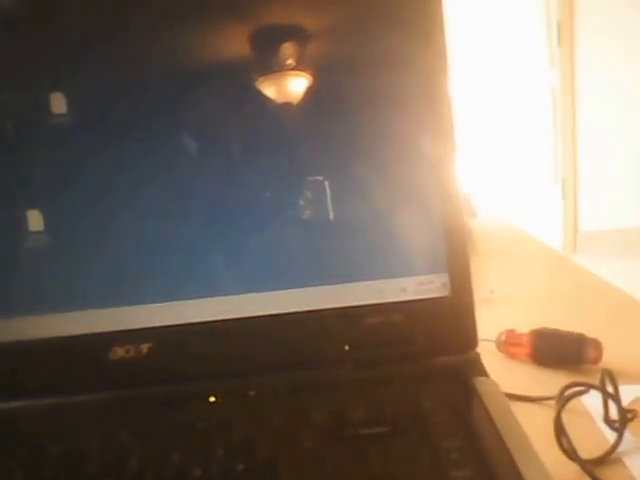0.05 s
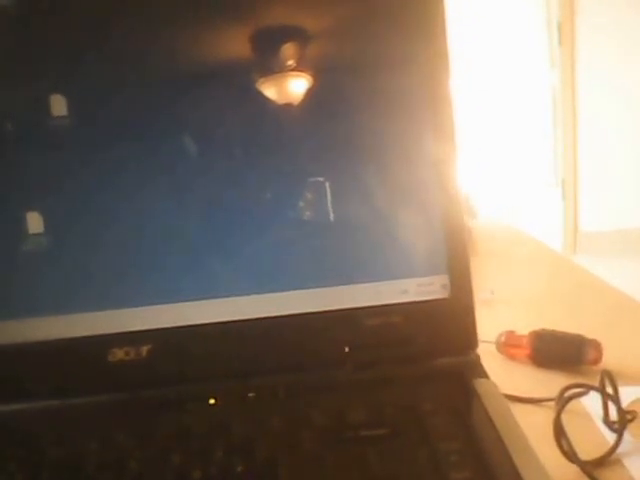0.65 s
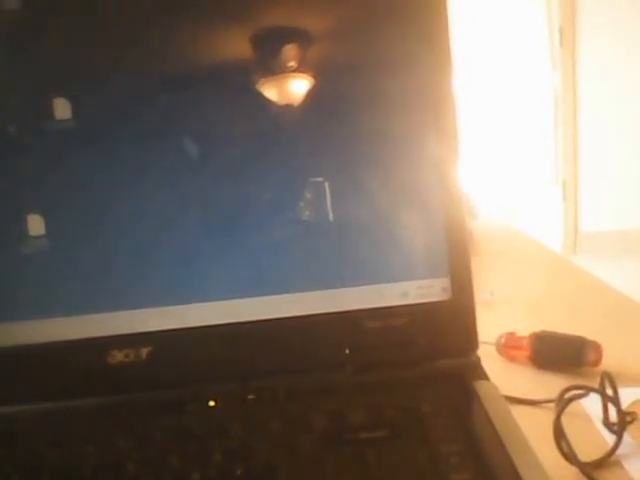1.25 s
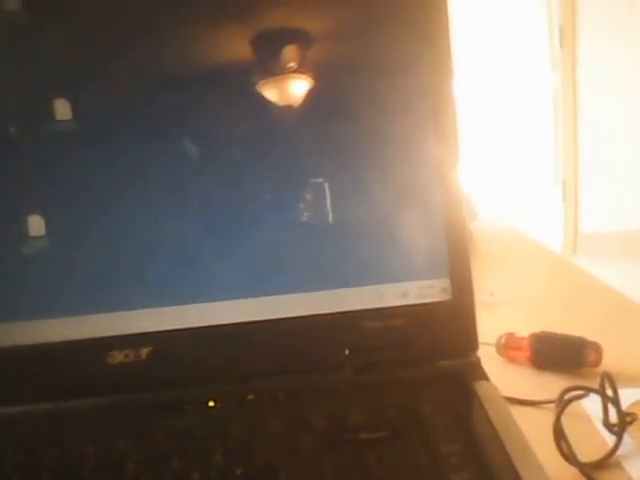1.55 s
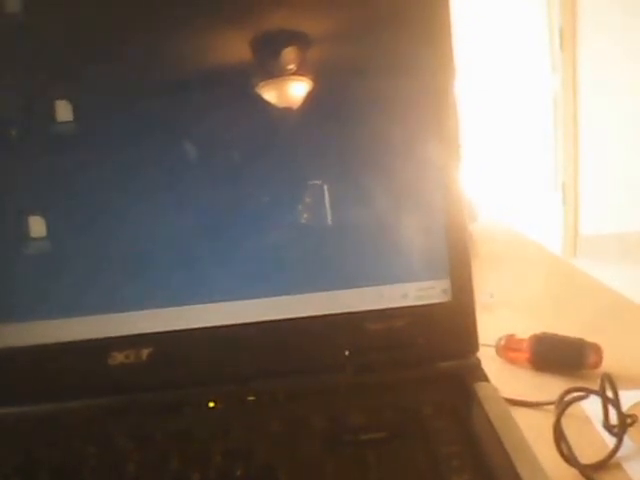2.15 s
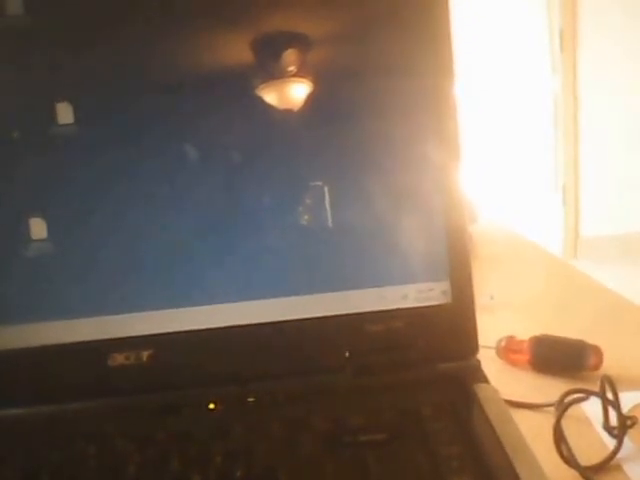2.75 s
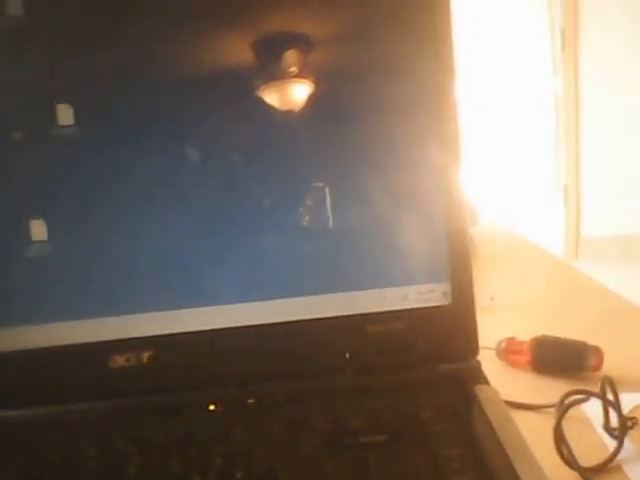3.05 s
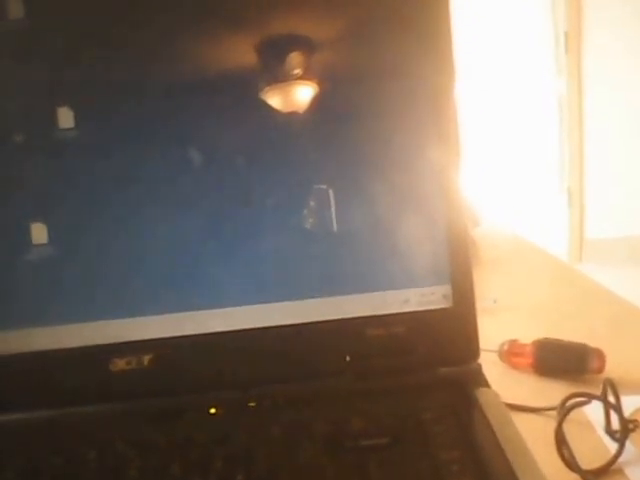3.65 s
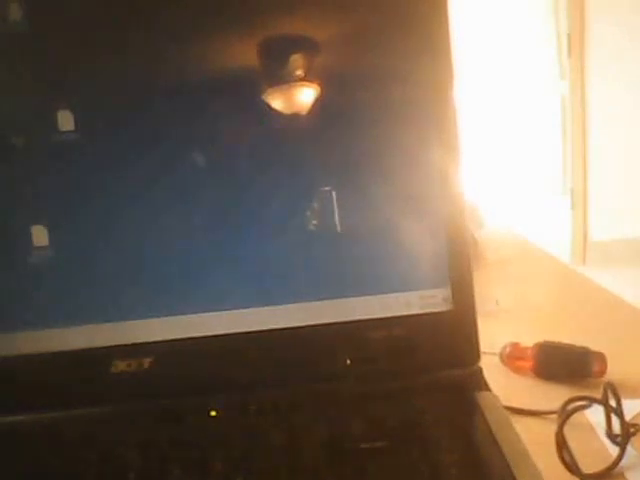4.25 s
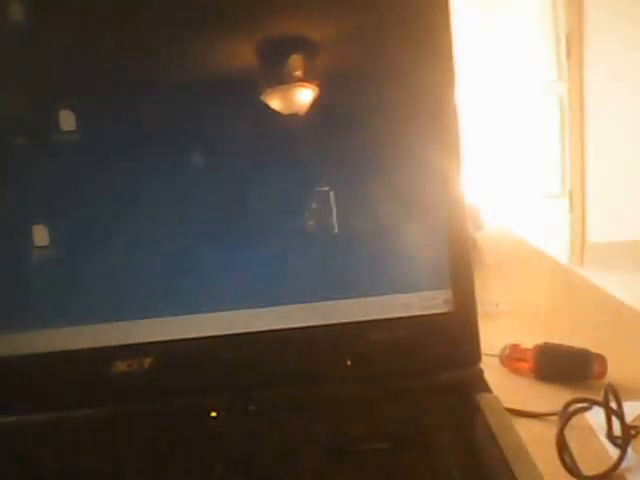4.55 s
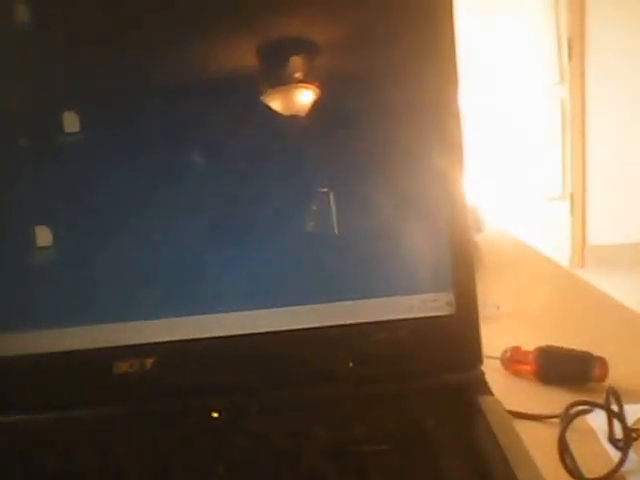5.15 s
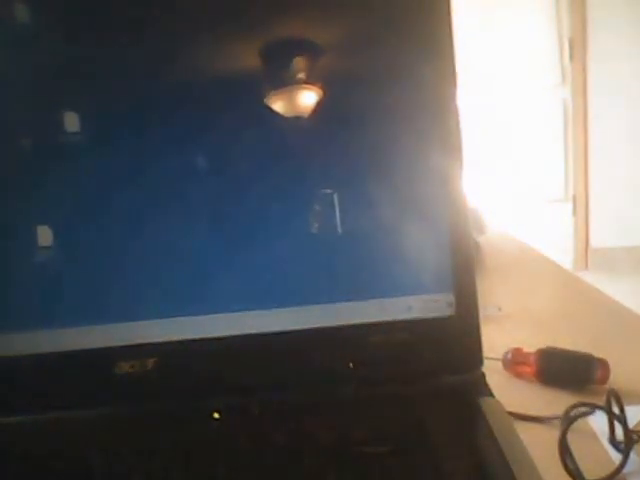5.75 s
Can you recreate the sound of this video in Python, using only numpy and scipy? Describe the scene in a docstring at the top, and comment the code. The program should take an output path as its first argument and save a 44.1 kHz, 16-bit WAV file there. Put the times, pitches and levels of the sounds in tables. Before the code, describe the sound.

Air rushes softly and steadily through a laptop's fans while their motor gives a low, beating hum, heard from close up in a quiet room. Beneath it a soft rumble throbs three or four times a second. The electronics add faint hiss, tiny ticks and a thin, high, warbling whine. Everything runs together throughout, with one slight rise in level near the start.

```python
"""Laptop fans in a quiet room

Close to a small microphone, air rushes steadily through a laptop's cooling fans.
A mains motor hums and beats against the line frequency, with faint upper overtones and a few thin
tones above them. A soft rumble throbs in a repeating pattern.
The electronics add hiss, tiny ticks and a faint warbling whine that cycles ten times a second."""
import sys
import numpy as np
from scipy.fft import rfft, irfft, next_fast_len
from scipy.io import wavfile
from scipy.ndimage import map_coordinates

SR = 44100
rng = np.random.default_rng(int(sys.argv[2]) if len(sys.argv) > 2 else 0)


def master_out(mix):
    """Clip the mix to full scale and print it as 16-bit PCM to the path in sys.argv[1]."""
    frames = np.transpose(np.atleast_2d(mix))
    ceiling = np.clip(frames, -1, 1)
    pcm = np.round(ceiling * 32767).astype(np.int16)
    wavfile.write(sys.argv[1], SR, pcm)


N = 260067
TIME_S = np.arange(N) / SR
WORK_CYCLE_HZ = 9.959


def amp(db):
    """Decibels to gain."""
    return 10 ** (np.asarray(db) / 20)


def wobble(rate_hz):
    """Smooth random curve with rate_hz knots a second."""
    knots = rng.standard_normal(int(N * rate_hz / SR) + 4)
    return map_coordinates(knots, [TIME_S * rate_hz])


def filtered(x, response):
    """Apply the frequency response response(hz)."""
    size = next_fast_len(N + SR // 2)
    return irfft(rfft(x, size) * response(np.fft.rfftfreq(size, 1 / SR)), size)[:N]


def shaped_noise(spectrum):
    """Noise from (freq_hz, density_db_per_hz) rows, joined on a log frequency axis."""
    freq_hz, density_db = np.transpose(spectrum)
    response = lambda hz: amp(np.interp(np.log(hz + 1), np.log(freq_hz + 1), density_db))
    return filtered(rng.standard_normal(N), response) * np.sqrt(SR / 2)


def noise_band(centre_hz, width_hz):
    """Gaussian-shaped band of noise, rms 1."""
    noise = filtered(rng.standard_normal(N), lambda hz: np.exp(-((hz - centre_hz) / width_hz) ** 2))
    return noise / np.sqrt(np.mean(noise ** 2))


# Electronic noise floor: freq_hz, density_db_per_hz
HISS_SPECTRUM = [(1000, -99), (3500, -99.5), (6000, -100.5), (10000, -101.5)]


def hiss():
    """The electronics give off a steady, nearly white noise."""
    return shaped_noise(HISS_SPECTRUM)


def ticks(first_s=.0615, cycles_per_tick=3.5, base_db=-53, vary_db=1):
    """Every third or fourth work cycle, a rasp ends in a very short spit of high treble."""
    cycles = np.floor(np.arange(0, N / SR * WORK_CYCLE_HZ, cycles_per_tick))
    times_s = first_s + cycles / WORK_CYCLE_HZ
    gains = amp(base_db + vary_db * rng.standard_normal(len(times_s)))

    def bursts(lead_s, half_width_s):
        return sum(gain * np.exp(-((TIME_S - at_s + lead_s) / half_width_s) ** 2)
                   for at_s, gain in zip(times_s, gains))

    rasp = bursts(lead_s=.0024, half_width_s=.0031) * noise_band(centre_hz=2310, width_hz=4000)
    spit = bursts(lead_s=0, half_width_s=.0013) * noise_band(centre_hz=10500, width_hz=2600)
    return amp(-1.5) * rasp + amp(-1) * spit


# Thin whistles: pitch_hz, relative_db
WHISTLE_TONES = [(4802, -21), (9598, -11.5), (10099, -1)]
# Work cycle stages: start_fraction, whine_hz, whine_db, whistle_db, rasp_db
LOAD_STAGES = [(.24, 4370, -68, -99, -68), (.51, 5015, -75, -101, -56.5), (.57, 5140, -64.5, -86, -91),
               (.84, 4957, -65, -64, -103)]


def electronics(warble_hz=175, jitter_cycles=.007, flicker_db=.5):
    """The load steps through its stages; a supply whine jumps with it, between a rasp and a whistle."""
    starts, *columns = np.transpose(LOAD_STAGES)
    cycle_fraction = (TIME_S * WORK_CYCLE_HZ + jitter_cycles * wobble(10)) % 1
    stage = np.searchsorted(starts, cycle_fraction) - 1
    whine_hz, whine_db, whistle_db, rasp_db = (column[stage] for column in columns)
    pitch_hz = whine_hz + warble_hz * wobble(400)
    whine = amp(whine_db - flicker_db * wobble(150)) * np.sin(2 * np.pi * np.cumsum(pitch_hz) / SR)
    whistle = amp(whistle_db) * sum(amp(db) * np.sin(2 * np.pi * hz * TIME_S) for hz, db in WHISTLE_TONES)
    rasp = amp(rasp_db) * noise_band(centre_hz=2190, width_hz=3200)
    return np.sqrt(2) * (whine + whistle) + rasp


# Faint high tones: pitch_hz, level_db
FAINT_TONES = [(962, -70), (1059, -87.5), (1114, -73), (1707, -80.5), (1990, -95), (2670, -83.5)]


def faint_tones(waver_rad=.87):
    """The motor's upper overtones and a few thin tones above them, each wavering slightly."""
    return np.sqrt(2) * sum(amp(db) * np.sin(2 * np.pi * hz * TIME_S + waver_rad * wobble(5))
                            for hz, db in FAINT_TONES)


def rumble(throb_hz=3.518, first_s=.255, gap_s=.051, gap_vary_s=.0007, half_width_s=.009,
           strong_db=-27.3, weak_db=-31, vary_db=.8, low_cut_hz=4):
    """Each throb is one strong, soft pressure push and four weaker ones, all a little uneven."""
    pressure = np.zeros(N)
    for push in range(5):
        delay_s = push * (gap_s + gap_vary_s * wobble(throb_hz))
        throbs = (TIME_S - first_s - delay_s) * throb_hz
        offset_s = (throbs - np.round(throbs)) / throb_hz
        level_db = (strong_db if push == 0 else weak_db) + vary_db * wobble(throb_hz)
        pressure -= amp(level_db) * np.exp(-(offset_s / half_width_s) ** 2)
    # The microphone cannot hold a pressure, so each push rebounds.
    return filtered(pressure - pressure.mean(), lambda hz: 1j * hz / (1j * hz + low_cut_hz))


# Hum line clusters, one step = one beat rate: rotor_order, centre_step, level_db, fall_db_per_step
HUM_CLUSTERS = [(2, 1, -40.5, 22.5), (3, .1, -55.5, 25), (4, 0, -49, 19), (4, 2, -60.5, 13),
                (5, .6, -51.5, 21), (6, 0, -59.5, 35), (7, 1.5, -56.5, 12), (8, 2, -59.5, 20),
                (9, 0, -56.5, 21), (9, 2, -61, 19), (10, 2.6, -58.5, 2), (12, 2, -63, 14),
                (13, 1.5, -62.5, 8), (14, 0, -56.5, 3.5), (15, -.4, -60.5, 4), (16, 0, -66.5, 24)]


def motor(mains_hz=60.008, rotor_hz=56.16, drift_rad=.056, scatter_rad=.65, flutter_db=.26,
          low_swell_s=.0062, high_swell_s=.065, first_high_order=9, sum_line_db=-53):
    """The rotor slips behind the mains, so each of its orders splits into lines that beat together."""
    beat_hz = 2 * (mains_hz - rotor_hz)
    shaft_rad = 2 * np.pi * rotor_hz * TIME_S + drift_rad * wobble(1.92)
    steps = np.arange(-1, 4)
    hum = np.zeros(N)
    for order, centre_step, level_db, fall_db in HUM_CLUSTERS:
        # The lines roughly align once a beat; the high orders swell about half a beat later.
        swell_s = low_swell_s if order < first_high_order else high_swell_s
        beat_rad = 2 * np.pi * beat_hz * (TIME_S - swell_s)
        gains = amp(-fall_db * np.abs(steps - centre_step))
        phases = rng.uniform(0, 2 * np.pi) + scatter_rad * rng.standard_normal(len(steps))
        lines = sum(gain * np.cos(order * shaft_rad + step * beat_rad + phase)
                    for step, gain, phase in zip(steps, gains, phases))
        hum += lines / np.linalg.norm(gains) * amp(level_db + flutter_db * wobble(6.3))
    # A line at mains plus rotor speed makes the deep hum pulse slowly.
    sum_line = amp(sum_line_db) * np.cos(shaft_rad + 2 * np.pi * mains_hz * TIME_S)
    return np.sqrt(2) * (hum + sum_line)


# Airflow before air_gain_db: freq_hz, density_db_per_hz
AIR_SPECTRUM = [(8, -67), (45, -61.5), (65, -72), (100, -77.5), (170, -76.5), (230, -72.5), (330, -77),
                (600, -79.7), (850, -79.3), (1000, -83.8), (1320, -86), (1550, -94.5), (1950, -95),
                (2700, -104)]


def fans(air_gain_db=1.23, turbulence_db=.3):
    """Air rushes through the vents with a little turbulence."""
    return shaped_noise(AIR_SPECTRUM) * amp(air_gain_db + turbulence_db * wobble(1.81))


# Overall level: time_s, gain_db
MIX_GAIN = [(0, -0.5), (.9, -1.14), (1.05, 1.06), (2, 0.64), (5.9, 1.04)]


def scene():
    """Hum, air, rumble and electrical noise in mono; the level steps up slightly at about 1 s."""
    mix = motor() + fans() + faint_tones() + rumble() + electronics() + ticks() + hiss()
    gain_db = np.interp(TIME_S, *np.transpose(MIX_GAIN))
    return (amp(gain_db) * mix)[None]


def record(dry):
    """The recorder rolls off the top treble and keeps nothing above its band limit."""
    roll_off_hz, limit_hz = 9950, 11750
    edge = lambda hz: np.clip((hz - roll_off_hz) / (limit_hz - roll_off_hz), 0, 1)
    return filtered(dry[0], lambda hz: np.cos(np.pi / 2 * edge(hz)) ** 2)[None]


dry = scene()
out = record(dry)
master_out(out)
```